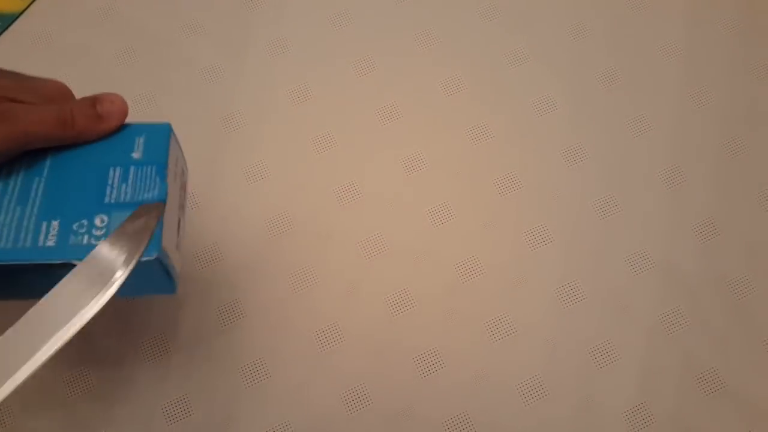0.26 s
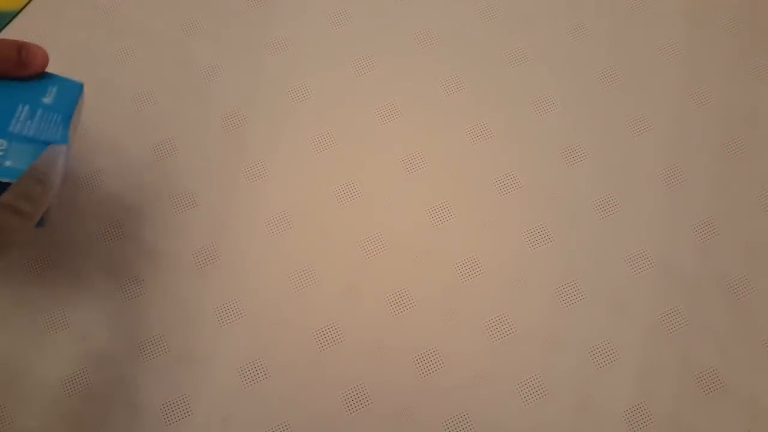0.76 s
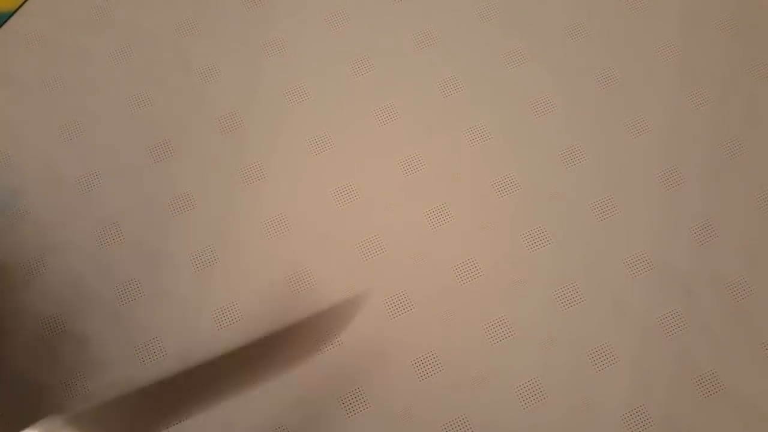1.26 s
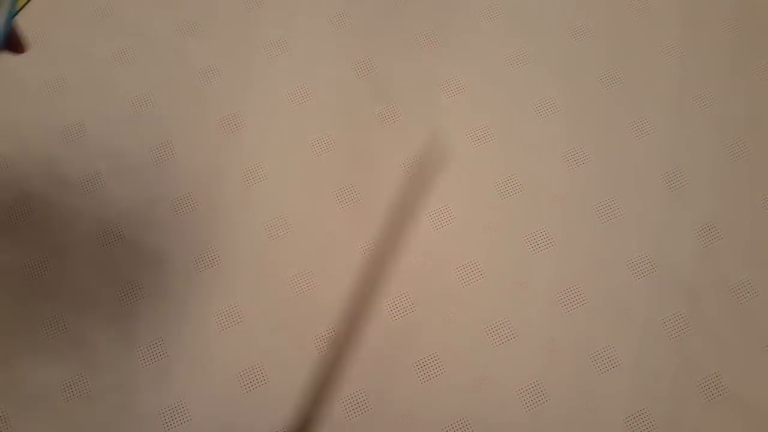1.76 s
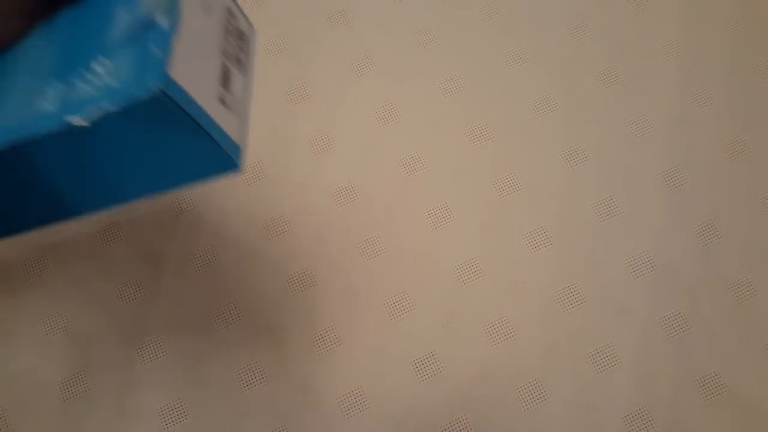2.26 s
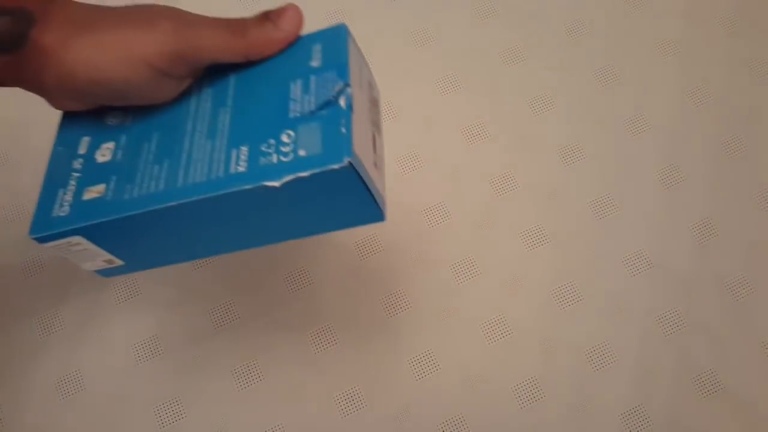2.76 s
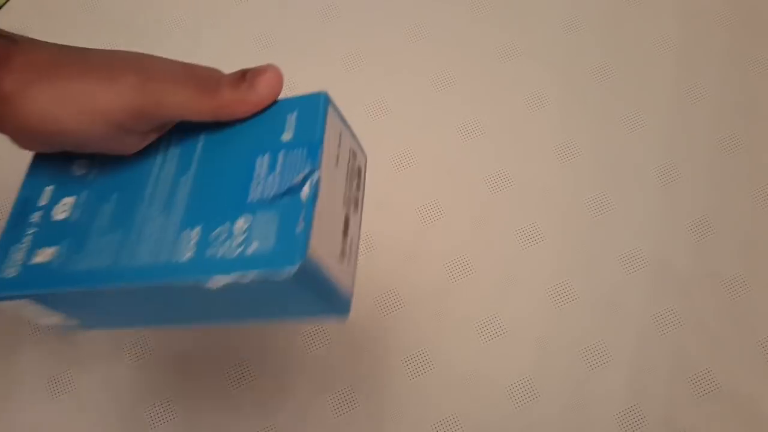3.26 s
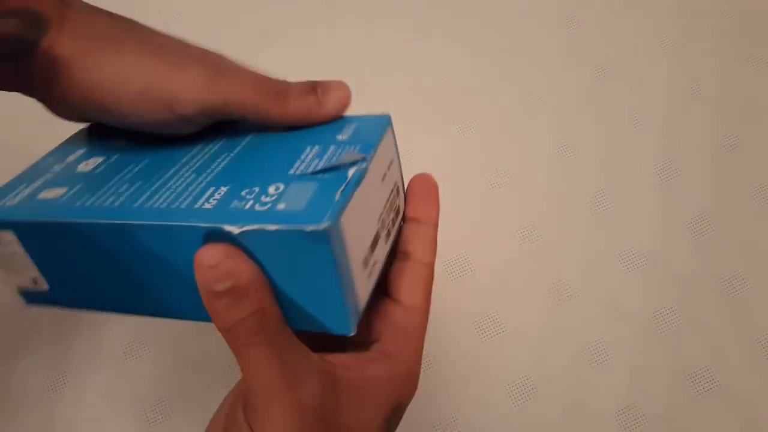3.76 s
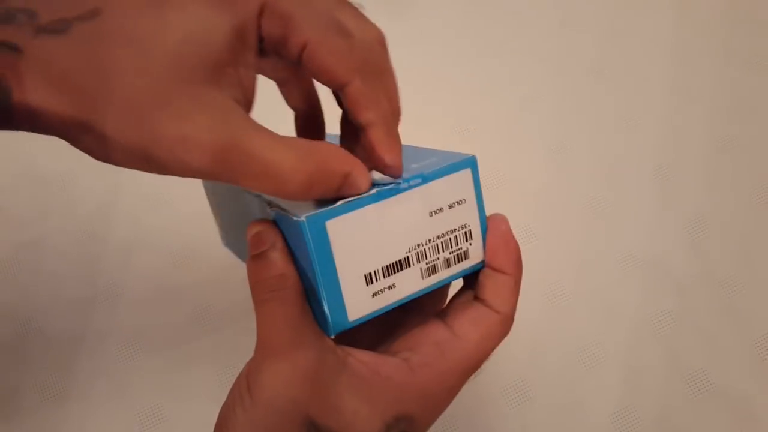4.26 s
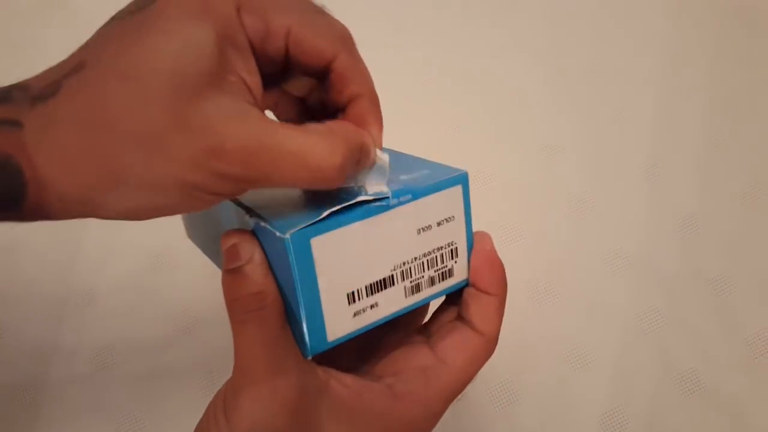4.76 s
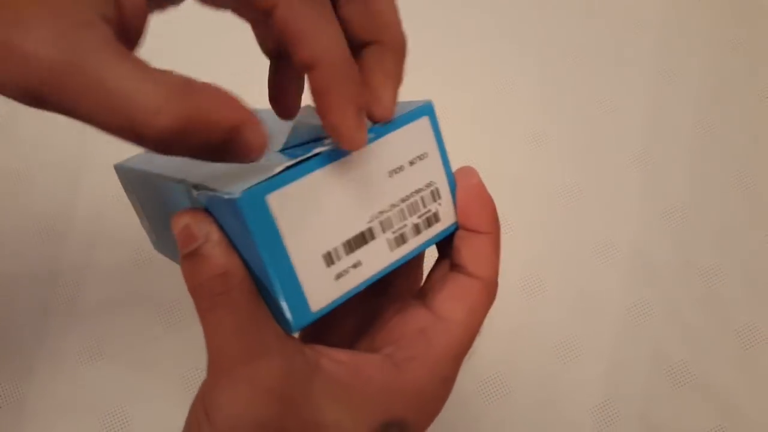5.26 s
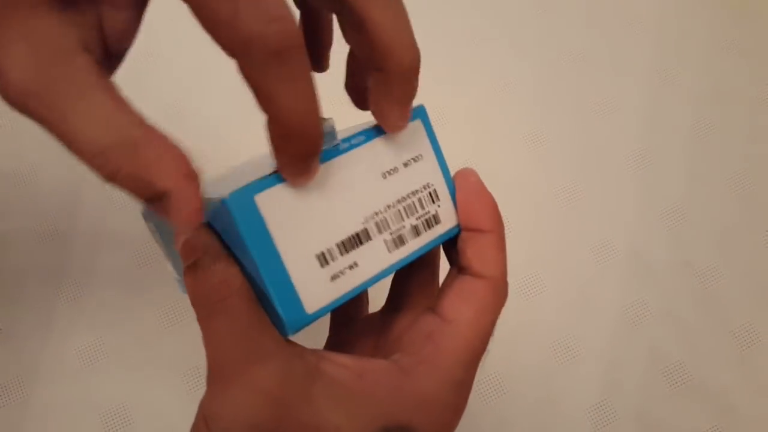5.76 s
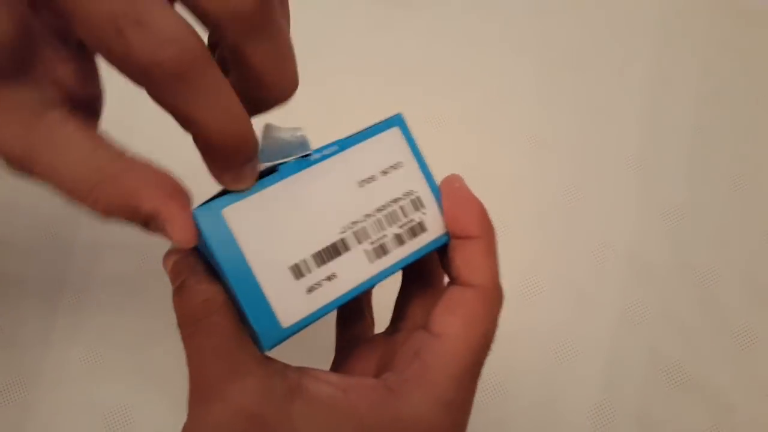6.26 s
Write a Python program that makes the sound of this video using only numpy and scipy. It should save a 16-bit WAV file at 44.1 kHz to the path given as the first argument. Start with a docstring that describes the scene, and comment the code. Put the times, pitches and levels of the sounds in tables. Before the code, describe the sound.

A small, fairly dry room with soft air noise and a faint low hum, heard close up in stereo. From 0 to 1.15 seconds a knife saws quietly at a cardboard box in short, uneven scratchy strokes with tiny creaks. At about 1.22 the seal bursts with a very loud, sharp crack, a brief steely ring and a hollow box thump; the blade slides out softly until 1.5. Near-quiet follows. At 3.0 to 3.1 the knife lands with a cluster of dull wooden thuds and clacks, then a short, low fading judder to about 3.25. From 3.4 to 4.2 palms rub the card, with hollow taps, strongest near 3.75. Tape peels in two quick rasps around 4.7 and 4.8. Bright snapping clicks come at 5.08 and 5.10, then crinkles at 5.25, 5.7 and 5.8, fingertip hisses and faint creaks until the end around 6.5.

```python
"""A knife saws at the seal of a small cardboard box until it tears with a loud crack and the blade rings.
The knife is laid on the table, hands rub and tap the box, and the tape is peeled and snaps free.
Friction is filtered noise of random tiny slips, tearing and catching are decaying noise bursts,
box, blade, flap, tape and table ring as sums of damped modes, and a snap is a downward sweep.
A small room adds a reflection and a diffuse tail; behind it all lie soft air noise and a mains hum."""
import sys
import numpy as np
from scipy import signal
from scipy.fft import rfft, irfft
from scipy.io import wavfile
from scipy.ndimage import uniform_filter1d

SR = 44100
rng = np.random.default_rng(int(sys.argv[2]) if len(sys.argv) > 2 else 0)


def wav_out(sig):
    """Save sig, one row per channel (or a flat mono array), as 16-bit PCM at SR to the path in sys.argv[1]."""
    wavfile.write(sys.argv[1], SR, np.round(np.clip(np.atleast_2d(sig).T, -1, 1) * 32767).astype(np.int16))


N = 286650
TIME = np.arange(N) / SR
RING_TIME = TIME[:SR // 2]
# upper limit of the sound and start of the snap's sweep (Hz)
EDGE_HZ = 16100

# the seal tearing through: t/s, level under the loudest rip/dB, 60 dB decay time/s
SEAL_TEARS = [(1.223, -33, .02), (1.2256, 0, .015), (1.2286, -7, .012), (1.232, -12, .03),
              (1.2392, -10, .04)]
# spectrum of creaking card: f/Hz, relative level/dB
CARD_SPECTRUM = [(200, -6.5), (600, -2), (1000, 0), (1400, -2), (2000, -0.5), (2550, 1.5), (3200, -11.5),
                 (6000, -21), (9000, -26), (12000, -31.5), (16000, -37.5)]
# spectrum of crinkling tape: f/Hz, relative level/dB
TAPE_SPECTRUM = [(300, -15), (1000, 0), (3000, -0.5), (5500, -5), (7500, -1.5), (9300, -1), (11000, -12),
                 (16000, -7)]
# modes of the cardboard box: f/Hz, level/dB, t60/s
BOX_MODES = [(114.9, -14, 0.02), (150, -20.5, 0.074), (236, -1.5, 0.018), (334, -3.5, 0.038),
             (416, -8.5, .05), (515, -11.5, 0.059), (719, -17, .07), (783, -22, 0.18),
             (903.6, -20.5, 0.031)]


def cutting():
    """Stick-slip friction: the blade saws at card and tape until the seal tears, then slides out of the cut."""
    # strokes along the seal: start t/s, length/s, card level before its trim/dB, tape over card/dB
    saw_strokes = [(.02, 0.084, -65, -3.5), (.11, 0.083, -74.5, 3.5), (.272, 0.061, -60.5, -14),
                   (.37, 0.067, -72, -7), (.475, 0.077, -70.5, -3), (.803, 0.042, -62.5, -9.5),
                   (.89, 0.047, -61.5, -11), (1.055, 0.095, -65.5, -28)]
    # blade sliding out: t/s, level/dB
    slide_level = [(1.3, -58), (1.36, -56.5), (1.395, -56), (1.42, -64.5), (1.45, -67), (1.49, -78)]
    # blade sliding out: f/Hz, relative level/dB
    slide_spectrum = [(76, -60), (130, 3), (282, -11.5), (395, -4), (732, -11), (1250, -12), (1690, -18.5),
                      (2020, -10), (2880, -13.5), (15000, -28)]
    # until the tear the leaning blade also scrapes faintly and steadily
    lean_card_db, lean_tape_db = -79.5, -80.5
    leaning = TIME < SEAL_TEARS[0][0]
    card, tape = two_layers(saw_strokes)
    # unrelated sounds add in power
    card = np.hypot(card, amp(lean_card_db) * leaning)
    tape = np.hypot(tape, amp(lean_tape_db) * leaning)
    card_rub = amp(-3.5) * rub(card, CARD_SPECTRUM, grain_db=3.0)
    tape_rub = rub(tape, TAPE_SPECTRUM, grain_db=2.5)
    saw = card_rub + tape_rub + snags(card)
    slide = rub(level(slide_level), slide_spectrum, grain_db=-2.0)
    return in_room(saw + slide, wet_db=-7)


def breakthrough():
    """Fracture and impulse response: the seal rips, the freed blade rings and the kicked box thumps."""
    # spectrum of the rip: f/Hz, relative level/dB
    tear_spectrum = [(200, -9.5), (450, 1), (800, -4), (1400, -4), (2000, -3), (2800, 2), (3700, -1),
                     (5000, -4.5), (6300, -6.5), (7600, -3.5), (11500, -5), (16000, -7.5)]
    # box kicked by the escaping blade: t/s, level/dB
    kicks = [(1.2281, -22), (1.2352, -32)]
    # modes of the steel blade: f/Hz, relative level/dB, t60/s
    blade_modes = [(2291, -0.5, 0.23), (2600, 1, 0.042), (3210, 4, .13), (3800, -7, .13),
                   (6145, -13.5, 0.2), (7540, -7, 0.18)]
    rip, thump = np.zeros((2, 2, N))
    for s, db, length in SEAL_TEARS:
        add(rip, s, amp(-21.5) * amp(db) * crackle(length, tear_spectrum))
    add(rip, SEAL_TEARS[1][0], amp(-44) * ring(blade_modes))
    for s, db in kicks:
        add(thump, s, amp(db) * struck(BOX_MODES, contact=0.00076))
    boom = in_room(from_right(thin(thump)), wet_db=-3.5)
    return in_room(panned(rip, 0.72), wet_db=-0.5) + boom


def knife_down():
    """Impact and friction: tip, then handle, land and skid; the handle judders unevenly to rest."""
    # landings: t/s, thud level/dB, contact time/s, clack level/dB
    landings = [(3.0078, -51, 0.00097, -65.5), (3.075, -37, 0.005, -60), (3.0805, -42, 0.0015, -41.5),
                (3.0827, -26.5, 0.0029, -53), (3.0888, -41, 0.0019, -45.5)]
    # spectrum of the clacks: f/Hz, relative level/dB
    clack_spectrum = [(200, 4), (600, 8.5), (950, 9), (1500, 1.5), (2600, -1), (4700, 0), (6300, -13),
                      (8000, -14), (11000, -25), (16000, -22)]
    # modes of the table top: f/Hz, level/dB, t60/s
    table_modes = [(44.3, -25.5, 0.43), (101, -10.5, 0.086), (141, -4, 0.061), (208.4, -6.5, 0.11),
                   (303, -4, 0.049), (358, -6, 0.021), (455.5, -3.5, 0.23), (520, -11, 0.21)]
    # skids of the knife: start t/s, length/s, level/dB
    skid_strokes = [(3.011, 0.026, -58.5), (3.14, 0.18, -69.5)]
    # steel on the table top: f/Hz, relative level/dB
    skid_spectrum = [(150, 6), (600, 2.5), (1200, -3.5), (2400, -9), (4500, -23), (8000, -23.5),
                     (16000, -31)]
    # the table shaking under the handle: f/Hz, relative level/dB
    chatter_spectrum = [(20, -6), (45, 3), (70, -7), (130, -1), (400, -5), (900, -19), (2500, -25),
                        (9000, -42)]
    thuds, clacks = np.zeros((2, 2, N))
    for s, thud_db, contact, clack_db in landings:
        add(thuds, s, amp(thud_db) * struck(table_modes, contact))
        add(clacks, s, amp(clack_db) * crackle(0.017, clack_spectrum))
    skid = rub(strokes(skid_strokes), skid_spectrum, grain_db=2.5)

    start_s, rise_s, hold_s, release_s = 3.1, .02, .075, .055
    start_db, fade_db_per_s = -39, 25
    start_hz, sag_hz_per_s = 170, 86
    length = rise_s + hold_s + release_s
    age = np.clip(TIME - start_s, 0, length)
    envelope = np.clip(np.minimum(age / rise_s, (length - age) / release_s), 0, 1)
    gain = envelope * amp(start_db - fade_db_per_s * age)
    # slow random wander of both strength and rate
    uneven = 1 + .06 * evened(uniform_filter1d(rng.standard_normal(N), size=300))
    phase = 2 * np.pi * np.cumsum((start_hz - sag_hz_per_s * age) * uneven) / SR
    shake = np.sqrt(2) * uneven * np.sin(phase)
    chatter = rub(amp(-13) * abs(shake), chatter_spectrum, grain_db=3)
    landed = in_room(from_right(thuds) + clacks + skid + gain * chatter, wet_db=-1)
    return landed + from_right([gain * shake] * 2)


def handling():
    """Friction and air resonance: skin drags over the card, snags and stirs the box's hollow tone."""
    # strokes of the palm: start t/s, length/s, level/dB, hollow tone over the rub/dB
    palm_strokes = [(3.44, .13, -73.5, -10.5), (3.625, 0.08, -68, 5), (3.76, .095, -61.5, -8),
                    (3.85, 0.16, -75.5, -10), (4.06, 0.49, -79, -10), (5.45, .05, -79, -6),
                    (6.1, 0.034, -75.5, 7)]
    # skin on card: f/Hz, relative level/dB
    palm_spectrum = [(100, -43), (170, 7.5), (334, -5.5), (495, -3.5), (533, -6.5), (1550, -14),
                     (2430, -10), (3890, -18.5), (6450, -18.5), (15000, -28)]
    # air in the rubbed box: f/Hz, relative level/dB
    hollow_spectrum = [(300, -32), (600, -2), (850, 2.5), (1100, -3.5), (1600, -16), (5000, -43)]
    skin, hollow = two_layers(palm_strokes)
    skin_rub = rub(skin, palm_spectrum, grain_db=3)
    hollow_tone = rub(hollow, hollow_spectrum, grain_db=4.5)
    return in_room(skin_rub + hollow_tone + snags(skin), wet_db=-12.0)


def peeling():
    """Adhesive failure: glue lets go thread by thread in two pulls; fingertips hiss over the tape."""
    # first pull: t/s, level before the common trim/dB
    first_pull = [(4.58, -88.5), (4.65, -65.5), (4.68, -53.5), (4.697, -53.5), (4.712, -49), (4.74, -47),
                  (4.76, -58.5), (4.8, -65)]
    # first pull: f/Hz, relative level/dB
    first_spectrum = [(300, -13.5), (900, -16.5), (1600, -6.5), (2700, -16.5), (6300, -15.5), (7800, -2.5),
                      (9500, -9), (12000, -14), (16000, -23)]
    # second pull: t/s, level before the common trim/dB
    second_pull = [(4.76, -65), (4.79, -58.5), (4.81, -50.5), (4.858, -59), (4.875, -78), (4.89, -81.5)]
    # second pull: f/Hz, relative level/dB
    second_spectrum = [(180, -45), (300, -24), (787, -4.5), (1300, -4.5), (2280, 4.5), (3520, -1.5),
                       (7570, 4.5), (12700, -9), (16000, -12.5)]
    # fingertips sliding on the tape: start t/s, length/s, level before the common trim/dB
    finger_strokes = [(4.35, 0.079, -77), (5.145, 0.033, -68), (5.225, 0.034, -67), (5.37, 0.036, -80),
                      (5.772, 0.016, -58.5), (5.88, .1, -82.5)]
    # hiss of the fingertips: f/Hz, relative level/dB
    finger_spectrum = [(500, -35), (3000, -6.5), (6200, -17), (7500, -2), (9300, -3), (10500, -18),
                       (16000, -24)]
    first = rub(level(first_pull), first_spectrum, grain_db=1.2)
    second = rub(level(second_pull), second_spectrum, grain_db=1.5)
    fingers = rub(strokes(finger_strokes), finger_spectrum, grain_db=2)
    pulls = amp(-4.5) * panned(first + second + fingers, 2.7)
    return in_room(pulls, wet_db=-5)


def snaps():
    """Dispersion and release of tension: taut tape clicks, rings briefly and knocks the box."""
    # snaps: t/s, click level/dB, ring of the tape/dB, knock on the box/dB, left over right/dB
    tape_snaps = [(5.0773, -52, -47, -63, 2), (5.0783, -39.5, -33.5, -52, 11),
                  (5.0998, -35.5, -41, -41, 10)]
    # spectrum of the click: f/Hz, relative level/dB
    snap_spectrum = [(100, -4), (300, 0), (700, 4), (1200, 0), (2500, 1), (4800, -5), (7000, -2),
                     (9500, -7), (12000, -11), (16000, -16)]
    # modes of the stretched tape: f/Hz, relative level/dB, t60/s
    tape_modes = [(7000, -6, .009), (7650, 0, .003), (8700, -13, .01)]
    out = np.zeros((2, N))
    spread_s = .0006
    # bending waves carry the treble out first, so the click is a very quick downward sweep
    sweep = signal.chirp(RING_TIME, EDGE_HZ, spread_s, 0) * (RING_TIME < spread_s)
    click = brief(colour(sweep[None], snap_spectrum))
    twang = brief(ring(tape_modes))
    knock = struck(BOX_MODES, contact=0.0033)
    for s, db, ring_db, knock_db, side_db in tape_snaps:
        tape = panned(amp(db) * click + amp(ring_db) * twang, side_db)
        add(out, s, tape + amp(knock_db) * knock)
    return in_room(out, wet_db=-11)


def catches():
    """Transient excitation: the card creaks, fingers tap the box and the tape crinkles."""
    # card giving under blade or grip: t/s, level/dB, 60 dB decay time/s
    creaks = [(.027, -61.5, 0.0064), (.394, -57.5, 0.0095), (0.499, -56.5, 0.025), (0.996, -67, 0.014),
              (1.042, -57.5, 0.015), (1.156, -65, 0.0098), (2.314, -71, .015), (3.614, -65, 0.021),
              (3.732, -51, 0.024), (4.432, -64.5, .018), (4.503, -66.5, 0.011), (5.937, -67.5, 0.017),
              (6.098, -65.5, 0.0086), (6.195, -63.5, 0.013), (6.233, -71, 0.012), (6.331, -66, 0.024),
              (6.37, -70.5, 0.0097), (6.464, -64.5, .015)]
    # fingers landing on the box: t/s, scuff level/dB, 60 dB decay time/s, knock level/dB
    taps = [(3.447, -63.5, 0.014, -68), (3.504, -59.5, 0.042, -61.5), (3.545, -60, 0.05, -53.5),
            (3.65, -62.5, .01, -64), (3.7603, -49, 0.01, -44.5), (3.833, -57, 0.056, -62),
            (4.083, -70, .015, -63.5), (4.149, -67, 0.033, -62), (4.896, -67.5, .014, -57.5),
            (5.388, -66, 0.0081, -72.5), (5.579, -69.5, 0.014, -56)]
    # loose tape tugging at the box: t/s, level/dB, 60 dB decay time/s, card over tape/dB, knock level/dB
    crinkles = [(4.728, -60, .049, -3, -85), (4.807, -64, .013, -13, -69),
                (5.2537, -46.5, 0.012, -3.5, -52.5), (5.567, -58.5, 0.06, -3, -70),
                (5.7064, -48.5, 0.013, -7, -71), (5.787, -53, 0.025, -22, -69),
                (5.868, -67, 0.011, -9, -73)]
    # modes of the stiff flap: f/Hz, relative level/dB, t60/s
    flap_modes = [(1950, -5, 0.004), (2290, 0, 0.024)]
    # build-up times (s)
    creak_rise_s, tap_rise_s, crinkle_rise_s = 0.0086, 0.0041, 0.0053
    # each creak stirs tape, box and flap by the same share (dB)
    creak_tape_db, creak_knock_db, creak_flap_db = -14, -9, -5.5
    # each tap rustles the tape by the same share (dB)
    tap_tape_db = -2.5
    # all lean left (left over right, dB)
    creak_side_db, tap_side_db, crinkle_side_db = 4.5, 2.5, 3.5
    box, tape = np.zeros((2, 2, N))
    flap = panned(amp(creak_flap_db) * brief(ring(flap_modes)), creak_side_db)
    for s, db, length in creaks:
        creak = catch(length, creak_rise_s, 0, creak_tape_db, creak_knock_db, creak_side_db)
        add(box, s, amp(db) * (creak + flap))
    for s, db, length, knock_db in taps:
        add(box, s, catch(length, tap_rise_s, db, db + tap_tape_db, knock_db, tap_side_db))
    for s, db, length, card_db, knock_db in crinkles:
        add(tape, s, catch(length, crinkle_rise_s, db + card_db, db, knock_db, crinkle_side_db))
    return in_room(box, wet_db=-5.0) + in_room(tape, wet_db=-8)


def snags(gain):
    """Random point process: small catches at random moments, scaled by the stroke that causes them."""
    per_second, peak_db = 23, -5  # peak is relative to the stroke
    sizes = amp(peak_db) * rng.uniform(.5, 1, N)
    train = gain * sizes * (rng.random(N) < per_second / SR)
    snag = catch(length=.009, rise=0.0016, card_db=-2, tape_db=-5, knock_db=0.5, side_db=6)
    return signal.oaconvolve(train[None], snag, axes=1)[:, :N]


def catch(length, rise, card_db, tape_db, knock_db, side_db):
    """Superposition: in one catch the card creaks, the tape crinkles and the box is knocked."""
    card = amp(card_db) * crackle(length, CARD_SPECTRUM, rise)
    tape = amp(tape_db) * crackle(length, TAPE_SPECTRUM, rise)
    knock = amp(knock_db) * struck(BOX_MODES, contact=0.0006)
    return panned(card + tape + knock, side_db)


def rub(gain, spectrum, grain_db):
    """Friction: a dense random run of tiny slips of uneven size under the stroke."""
    slips = rng.exponential(1, N)
    sizes = amp(grain_db * np.minimum(slips, 5)) * (rng.random(N) < 5000 / SR)  # 5000 slips per second
    return gain * evened(colour(paired(sizes * rng.standard_normal((2, N))), spectrum))


def crackle(length, spectrum, rise=.0004):
    """Fracture: many fibres breaking at once, building in rise seconds, decaying by 60 dB in length."""
    noise = paired(rng.standard_normal((2, len(RING_TIME))))
    envelope = np.minimum(RING_TIME / rise, 1) * amp(-60 * RING_TIME / length)
    return brief(colour(noise * envelope, spectrum))


def ring(modes):
    """Modal synthesis: a sum of exponentially damped cosines."""
    partials = []
    for hz, db, t60 in modes:
        decay = amp(db - 60 * RING_TIME / t60)
        partials.append(decay * np.cos(2 * np.pi * hz * RING_TIME))
    return sum(partials)


def struck(modes, contact):
    """Contact filtering: modes set off by a soft push; the longer its contact (s), the duller."""
    push = np.sin(np.pi * np.minimum(RING_TIME / contact, 1)) ** 2
    return signal.fftconvolve(ring(modes), push / push.sum())[:len(RING_TIME)]


def strokes(rows):
    """Amplitude envelope: strokes (start t/s, length/s, level/dB) as smooth arches summed in power."""
    edge_db = -4  # start and end of a stroke relative to its middle
    arches = []
    for start, length, db in rows:
        position = 2 * (TIME - start) / length - 1
        arches.append(amp(db - abs(edge_db) * position ** 2))
    return np.linalg.norm(arches, axis=0)


def two_layers(rows):
    """Common excitation: two layers driven by the same strokes, the last column second over first (dB)."""
    first = [row[:3] for row in rows]
    second = [(s, length, db + over_db) for s, length, db, over_db in rows]
    return strokes(first), strokes(second)


def level(curve):
    """Amplitude envelope: gain over time from t/s, level/dB, at -200 dB outside the curve."""
    times, db = np.transpose(curve)
    return amp(np.interp(TIME, times, db, left=-200, right=-200))


def amp(db):
    """Decibel law: level to amplitude gain."""
    return 10 ** (np.asarray(db) / 20)


def evened(x):
    """Power normalisation: scales to an rms of one."""
    return x / np.sqrt(np.mean(x ** 2) + 1e-20)


def brief(x):
    """Energy normalisation: gives a click the energy of 4 ms at full level."""
    return x * np.sqrt(.004 * SR / np.mean(np.sum(x ** 2, axis=-1)))


def read(points, hz):
    """Logarithmic frequency scale: interpolates a table of f/Hz, value."""
    f, value = np.transpose(points)
    return np.interp(np.log(hz + 1), np.log(f + 1), value)


def colour(x, spectrum, size=4096):
    """Minimum-phase filtering: a causal filter of unit energy shaped like the spectrum."""
    log_gain = np.log(amp(read(spectrum, abs(np.fft.fftfreq(size, 1 / SR)))))
    # the Hilbert transform of the log gain yields the minimum phase
    taps = np.fft.ifft(np.exp(np.conj(signal.hilbert(log_gain)))).real
    taps /= np.linalg.norm(taps)
    return signal.fftconvolve(x, taps[None], axes=1)[:, :x.shape[1]]


def add(mix, s, sound):
    """Superposition: mixes a sound in at time s."""
    part = mix[..., round(s * SR):][..., :sound.shape[-1]]
    part += sound[..., :part.shape[-1]]


def panned(x, side_db):
    """Interaural level difference: leans a sound to the left by side_db, keeping its power."""
    return x * evened(amp([[side_db / 2], [-side_db / 2]]))


def from_right(x):
    """Path difference: box and table lie to the right, so their thuds reach the left channel later."""
    lag_s = 0.00022
    delay = np.exp(-2j * np.pi * np.fft.rfftfreq(N, 1 / SR) * lag_s)
    return np.array([irfft(rfft(x[0]) * delay, N), x[1]])


def thin(x):
    """High-pass filtering: a second-order high-pass at 55 Hz takes out the deepest bass below the thump."""
    return signal.sosfilt(signal.butter(2, 55, "highpass", fs=SR, output="sos"), x)


def paired(x):
    """Diffuse-field coherence: two unrelated signals become a pair alike by a share set per frequency."""
    # likeness of the two channels: f/Hz, left-right correlation (1)
    likeness = [(40, 0.24), (130, 0.73), (300, 0.4), (640, 0.48), (1400, -0.38), (3000, 0), (15000, -0.11)]
    a, b = rfft(x)
    same = np.clip(read(likeness, np.fft.rfftfreq(x.shape[1], 1 / SR)), -1, 1)
    return irfft([a, same * a + np.sqrt(1 - same ** 2) * b], x.shape[1])


def in_room(x, wet_db):
    """Reverberation: the direct sound, one near reflection and a short diffuse tail."""
    # room decay: f/Hz, t60/s
    room_decay = [(100, 0.13), (400, .28), (1200, 0.19), (3000, 0.16), (7000, 0.15), (15000, 0.12)]
    noise = paired(rng.choice([-1., 1.], (2, SR // 2)))
    hz, t, z = signal.stft(noise, SR, nperseg=256)
    decay = amp(-60 * t / read(room_decay, hz)[:, None])
    tail = signal.istft(z * decay, SR, nperseg=256)[1][:, :SR // 2]
    tail *= np.clip(RING_TIME / 0.0067, 0, 1)  # the tail builds up over 6.7 ms
    response = amp(wet_db) * tail / np.linalg.norm(tail[0])
    response[:, 0] += 1
    response[:, round(.0072 * SR)] += amp(-24)  # near reflection after 7.2 ms
    return x + signal.fftconvolve(x, response, axes=1)[:, :N]


def room_tone():
    """Stationary background: soft broadband air noise and a sinusoidal mains hum."""
    # spectrum of the room air: f/Hz, relative level/dB
    air_spectrum = [(25, -10.5), (60, -8), (110, -1.5), (200, -0.5), (350, -7), (700, -13.5), (1400, -13.5),
                    (2700, -16.5), (5500, -25), (9000, -28.5), (11000, -30), (15000, -24.5)]
    air_db, hum_hz, hum_db = -66.5, 120.2, -67
    air = evened(colour(paired(rng.standard_normal((2, N))), air_spectrum))
    hum = np.sqrt(2) * np.sin(2 * np.pi * hum_hz * TIME)
    return amp(air_db) * air + panned(amp(hum_db) * hum, 1.1)


def scene():
    """Superposition: all sources at the table and the room's background, in stereo."""
    sawing = cutting() + breakthrough()
    hands = handling() + peeling() + snaps() + catches()
    return sawing + knife_down() + hands + room_tone()


def record(dry):
    """Band limiting: a linear-phase low-pass at EDGE_HZ."""
    taps = signal.firwin(601, EDGE_HZ, window=("kaiser", 9), fs=SR)
    return signal.oaconvolve(dry, taps[None], "same")


dry = scene()
out = record(dry)
wav_out(out)
```